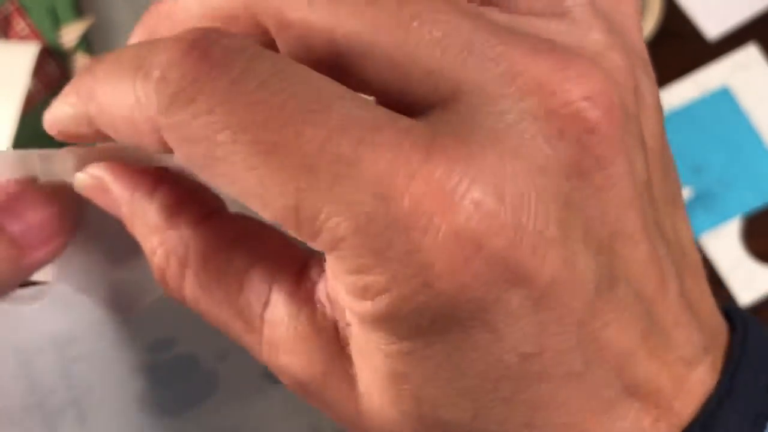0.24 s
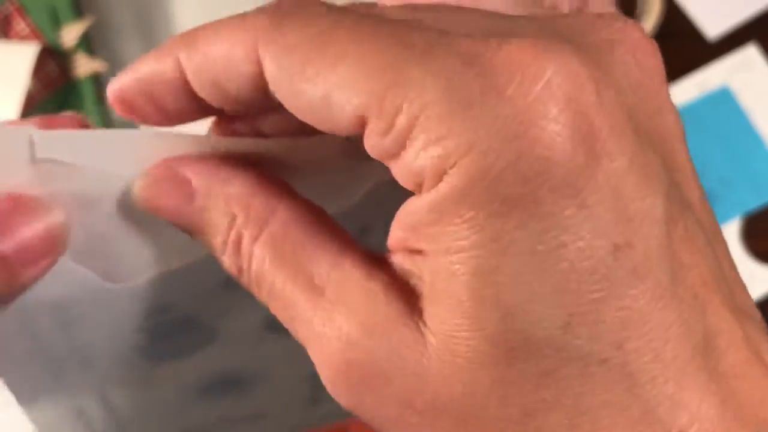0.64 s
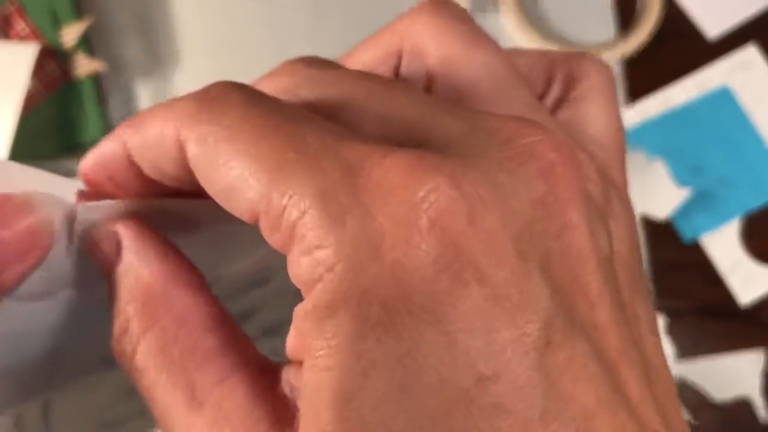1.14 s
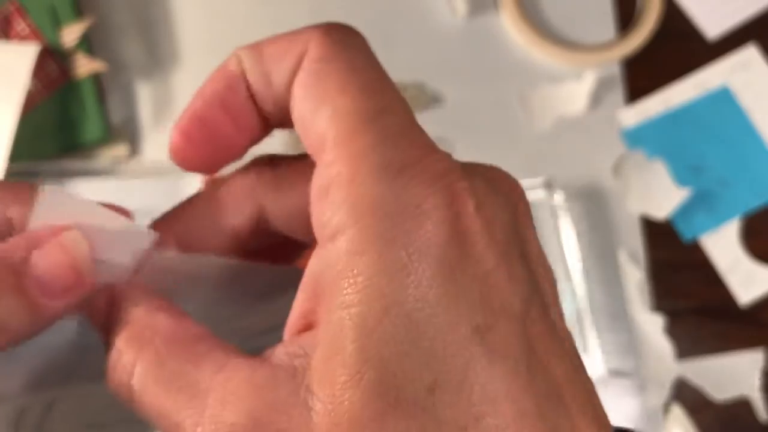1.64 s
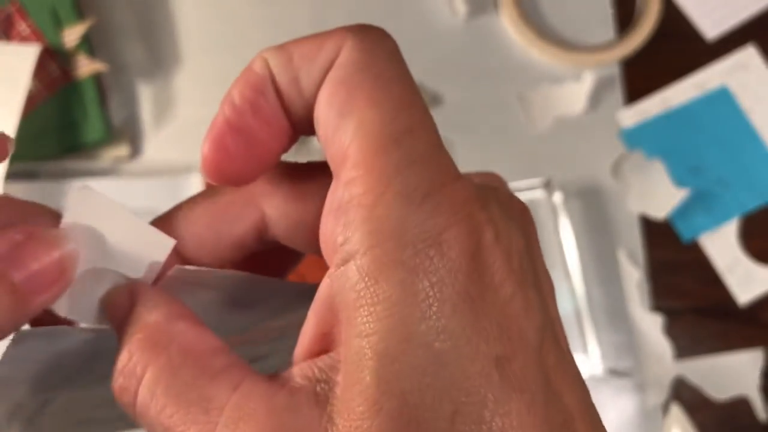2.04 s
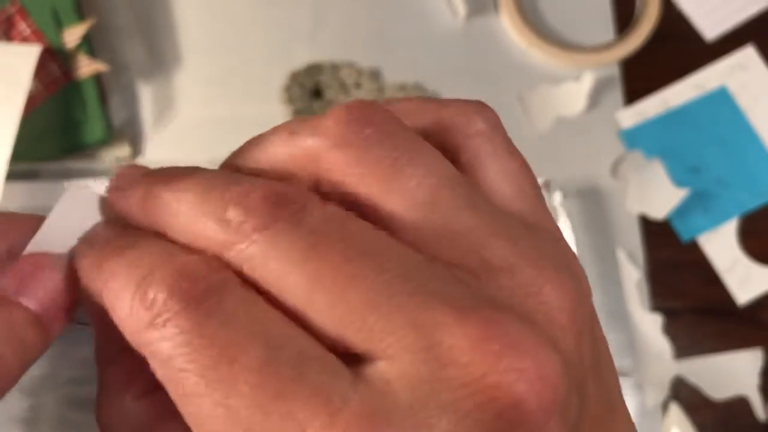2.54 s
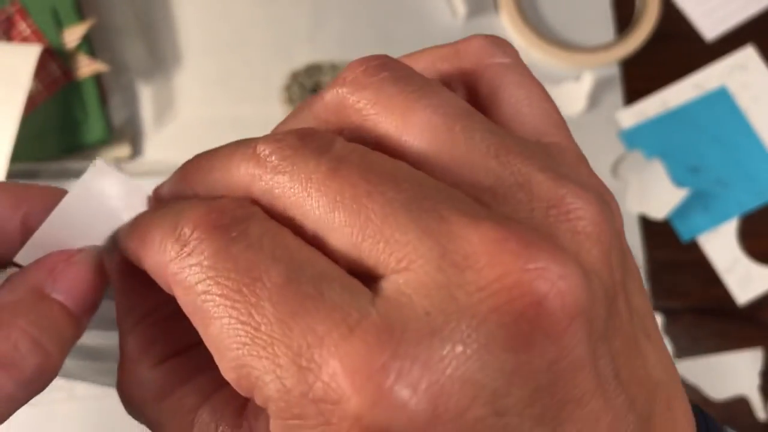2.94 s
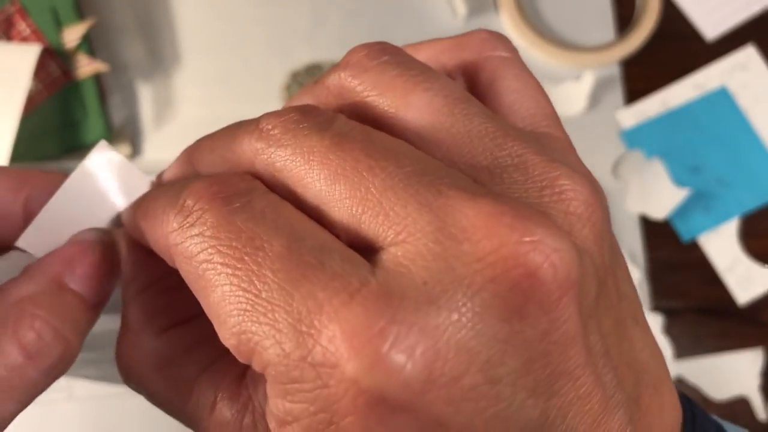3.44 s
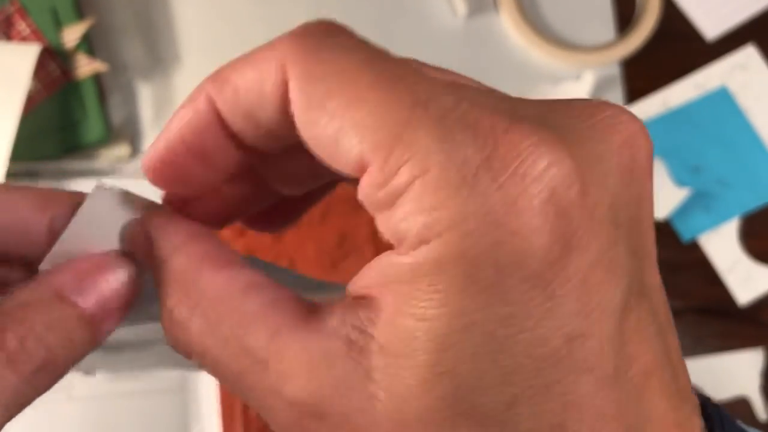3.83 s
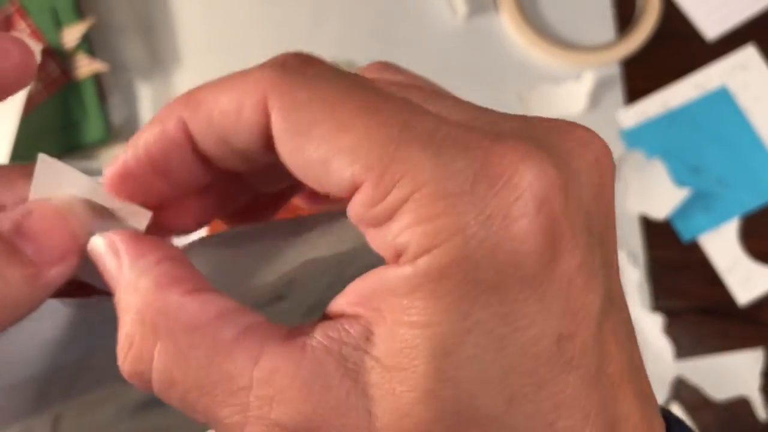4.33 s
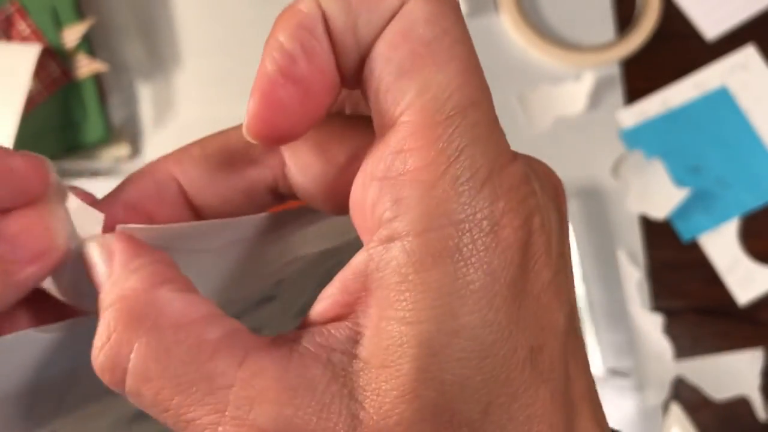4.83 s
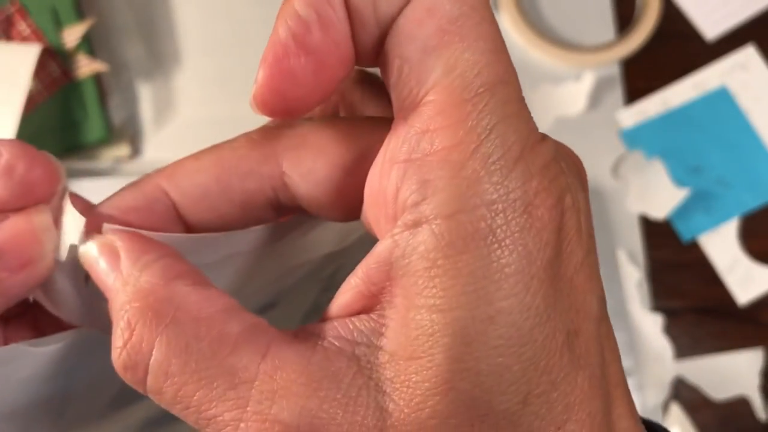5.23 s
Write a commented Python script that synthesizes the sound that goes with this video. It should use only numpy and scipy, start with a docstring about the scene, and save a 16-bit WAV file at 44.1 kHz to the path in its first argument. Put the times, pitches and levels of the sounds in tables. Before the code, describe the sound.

Fingernails pick at the corner of a small adhesive sheet, heard close up at a table in a quiet room. The stiff film gives light, irregular snaps and crinkles, mixed with brief nail scrapes and papery fingertip rubbing. The clicks are busiest and sharpest in the first two seconds, then thin out into tiny sticky ticks before a little more picking. Hands softly bump the table a few times over a faint hum.

```python
"""At a table in a quiet room, fingernails pick at the corner of a small sticky sheet, heard close up.
The stiff film snaps as a nail slips off its edge. Nails scrape, fingertips slide over the backing,
the film crinkles and threads of glue let go with tiny ticks. Hard flicks knock the table, and it booms
low when the hands softly bump it. Faint rumble and hum lie under it all."""
import sys
import numpy as np
from scipy import signal
from scipy.fft import rfft, irfft, next_fast_len
from scipy.io import wavfile
from scipy.ndimage import uniform_filter1d, map_coordinates

SR = 44100
rng = np.random.default_rng(int(sys.argv[2]) if len(sys.argv) > 2 else 0)


def int16_out(signal):
    """Quantize to a 16-bit WAV file."""
    q = np.round(np.clip(np.atleast_2d(signal).T, -1, 1) * 32767)
    wavfile.write(sys.argv[1], SR, q.astype(np.int16))


N = 241484  # about 5.5 seconds
TOP_HZ = 16100  # upper edge of the treble


def amp(db):
    """Turn decibels into a number to multiply by."""
    return 10 ** (np.asarray(db) / 20)


def unit(x):
    """Scale a sound so that its average (rms) level is 1."""
    return x / np.sqrt(np.mean(x ** 2) + 1e-20)


def along(points, hz):
    """Read between (Hz, value) points, with octaves evenly spaced."""
    point_hz, values = np.transpose(points)
    return np.interp(np.log(hz + 1), np.log(point_hz + 1), values)


def wobble(rate):
    """A smooth random curve that passes through `rate` new values a second."""
    values = rng.standard_normal(int(N * rate / SR) + 4)
    return map_coordinates(values, [np.arange(N) * rate / SR])


def filtered(x, response):
    """Change a sound's tone: `response` gives the gain at each frequency."""
    size = next_fast_len(len(x) + 8192)
    hz = np.fft.rfftfreq(size, 1 / SR) + 1
    return irfft(rfft(x, size) * response(hz), size)[:len(x)]


def causal(x, response, size=4096):
    """Change a short sound's tone so that nothing rings before its start."""
    hz = np.fft.rfftfreq(size, 1 / SR) + 1
    cepstrum = irfft(np.log(np.maximum(response(hz), 1e-6)))
    # move the filter's early ringing to after the start
    cepstrum[1:size // 2] *= 2
    cepstrum[size // 2 + 1:] = 0
    return irfft(rfft(x, size) * np.exp(rfft(cepstrum)))


def friction(count, rate, spread_db, share):
    """Surfaces catch and slip `rate` times a second; `share` is the catches' part of the energy."""
    catches = (rng.random(count) < rate / SR) * rng.choice([-1, 1], count)
    sizes = amp(spread_db * np.minimum(rng.exponential(size=count), 3))
    sliding = rng.standard_normal(count)
    return np.sqrt(share) * unit(catches * sizes) + np.sqrt(1 - share) * sliding


def film(hz, low_hz, high_hz, leak_db=-22):
    """A flap of film sounds mostly between two frequencies: the smaller the flap, the higher they lie."""
    bass_cut = amp(leak_db) + (1 + (low_hz / hz) ** 6) ** -.5
    return bass_cut / np.sqrt(1 + (hz / high_hz) ** 5)


def strike(flutter, tone, share):
    """One crack, holding `share` of the energy, and its flutter are given the same tone."""
    crack = unit(causal(np.ones(1), tone))
    return unit(np.sqrt(share) * crack + np.sqrt(1 - share) * unit(causal(flutter, tone)))


def thud(count, low_hz, high_hz):
    """Dull noise, mostly between two frequencies."""
    noise = rng.standard_normal(count)
    return unit(filtered(noise, lambda hz: 1 / (1 + (low_hz / hz) ** 3 + (hz / high_hz) ** 4)))


# The tone of the room's rumble and hiss. Each row: frequency in Hz, relative level in dB.
AIR_TONE = [(20, -15.5), (35, -9.5), (54, -0.5), (92, -7.5), (125, -11.5), (160, -14), (230, -20),
            (370, -19.5), (500, -29.5), (900, -32), (2400, -38), (6000, -46.5), (10000, -50), (15500, -42)]
# The steady notes of the hum. Each row: pitch in Hz, level in dB.
HUM_NOTES = [(59, -69), (119, -68.5), (188, -72), (381, -78.5)]
def background(air_db=-59.0, waver_db=2):
    """The room rumbles and hisses faintly, with a wavering hum."""
    t = np.arange(N) / SR
    air = unit(filtered(rng.standard_normal(N), lambda hz: amp(along(AIR_TONE, hz))))
    hum = np.zeros(N)
    for hz, db in HUM_NOTES:
        peak = amp(db + waver_db * wobble(4)) * np.sqrt(2)
        hum += peak * np.sin(2 * np.pi * hz * t + 0.72 * wobble(4))
    return amp(air_db) * air + hum


# The film snapping off a nail. Each row: start in seconds, level in dB, low and high edge in Hz,
# ring pitch in Hz, ring level in dB above the rest of the snap, seconds for the flutter to fade 60 dB.
SNAPS = [(0.0572, -44.5, 950, 4570, 3380, -9.5, 0.012), (.153, -55.5, 920, 8700, 3200, 0, 0.015),
         (.224, -54, 300, 6700, 2040, -4, 0.011), (0.5432, -57.5, 490, 4280, 517, -2, 0.02),
         (.568, -53.5, 510, 5200, 1720, 11, 0.026), (.612, -52, 1400, 10000, 2800, -14, 0.035),
         (0.692, -47, 300, 7300, 1300, -8, 0.059), (0.7066, -37.5, 590, 10300, 1490, -11, 0.029),
         (0.7096, -43.5, 200, 7000, 400, -1, 0.012), (0.715, -46.5, 300, 7700, 980, 4, .017),
         (0.7366, -53.5, 370, 8900, 910, -3, 0.021), (0.816, -37, 390, 4240, 980, 0, 0.014),
         (0.8353, -46.5, 640, 8360, 1000, -5, 0.043), (0.926, -43, 506, 2800, 2980, -5, .025),
         (0.9291, -46.5, 300, 3070, 1800, -3, 0.021), (0.9564, -34, 330, 6250, 1510, -8.5, 0.016),
         (1.0253, -51.5, 300, 10000, 494, -9, 0.038), (1.043, -47.5, 308, 3340, 560, 1, 0.03),
         (1.201, -43.5, 2170, 12900, 2900, -9, 0.028), (1.2227, -59.5, 447, 1100, 690, -2, .02),
         (1.274, -49.5, 1660, 3120, 2820, -3, 0.0098), (1.4626, -53, 3200, 17000, 3200, -20, 0.015),
         (1.4866, -27.5, 2940, 16700, 5560, -15, 0.0093), (1.4924, -34.5, 2840, 17000, 2950, -19, 0.023),
         (1.6929, -30, 3000, 17000, 12400, 3, .024), (1.7031, -35.5, 1190, 17000, 7200, 1, 0.018),
         (1.7114, -40, 1190, 17000, 13000, 2, 0.017), (1.7213, -33, 850, 9200, 3060, 0.5, 0.015),
         (1.7597, -49, 300, 9600, 870, -17, 0.058), (1.766, -47.5, 630, 13000, 3600, -2, 0.031),
         (1.786, -58, 300, 1000, 516, 2, .025), (1.8164, -45.5, 3450, 16000, 3870, -7, 0.057),
         (1.8219, -44, 2500, 14000, 14700, 2, 0.045), (1.9324, -54.5, 530, 3380, 1010, 1, 0.023),
         (1.9839, -50, 490, 5750, 920, 5, 0.017), (2.0605, -33.5, 700, 3940, 1950, 0, 0.018),
         (2.3602, -60.5, 296, 14200, 1580, -12, .03), (2.3905, -58, 790, 17000, 3900, -18, .04),
         (2.6061, -57, 300, 8450, 460, -8, 0.059), (2.7133, -57, 293, 960, 950, -24, 0.021),
         (2.79, -53.5, 2620, 17000, 8730, -3, 0.039), (2.9011, -58, 7350, 14000, 13900, -17, 0.029),
         (3.191, -43, 3500, 17400, 14600, -12, .018), (3.503, -66, 700, 4540, 1300, -6, .018),
         (3.688, -58, 300, 1800, 935, 1, 0.033), (3.8561, -44.5, 550, 17000, 9400, 5, .009),
         (4.027, -54, 500, 3670, 990, -6, 0.02), (4.1395, -58.5, 380, 16900, 1000, -6, 0.012),
         (4.4135, -48, 630, 7000, 6060, -9, 0.03), (4.4981, -58.5, 790, 4120, 3200, 4, .014),
         (4.5104, -57.5, 460, 14000, 4600, -8, .016), (4.5483, -44.5, 1580, 3230, 2900, -16, .018),
         (4.567, -48.5, 300, 5000, 910, -14, 0.014), (4.6603, -57.5, 410, 8300, 3700, -7, 0.053),
         (4.682, -50, 296, 7600, 1130, -5, 0.017), (4.893, -64, 900, 8000, 1500, -4, 0.026),
         (4.9877, -61, 980, 13100, 1020, -8, 0.018), (5.0353, -59.5, 490, 8050, 560, -4, 0.014),
         (5.4572, -55.5, 436, 16000, 950, -25, .026)]
def snaps(sharpness=6, ring_crack_share=0.66):
    """Each snap is one sharp crack and a brief flutter, which set the flap of film ringing."""
    out, t = np.zeros(N), np.arange(SR // 16) / SR
    for start, db, low_hz, high_hz, ring_hz, ring_db, fade_s in SNAPS:
        flutter = friction(len(t), rate=2500, spread_db=4.5, share=0.73) * amp(-60 * t / fade_s)
        # a quick release has more crack, a slow one is mostly flutter
        crack_share = .8 * np.exp(-fade_s / 0.016)
        band = lambda hz: film(hz, low_hz, high_hz)
        # the flap's free length sets the pitch of its ring
        ring = lambda hz: band(hz) / np.hypot(1, sharpness * (hz / ring_hz - ring_hz / hz))
        snap = strike(flutter, band, crack_share) + amp(ring_db) * strike(flutter, ring, ring_crack_share)
        # set the level as if all the energy fell in a hundredth of a second
        add(out, start, amp(db) * snap / np.linalg.norm(snap) * np.sqrt(SR / 100))
    return out


# Short nail scrapes. Each row: start in seconds, length in seconds, level in dB, strongest frequency in Hz.
SCRAPES = [(0.087, 0.035, -65, 2760), (0.21, 0.023, -58.5, 2950), (0.233, 0.11, -66.5, 428),
           (0.589, .028, -59.5, 5400), (0.678, 0.025, -55.5, 3480), (0.837, 0.046, -54, 4460),
           (0.895, 0.035, -65, 3500), (1.028, 0.032, -58.5, 3500), (1.058, 0.0072, -66, 870),
           (1.253, 0.035, -68.5, 2600), (1.403, 0.033, -59, 4200), (1.728, 0.046, -61, 6950),
           (1.817, 0.012, -54, 8900), (2.644, 0.054, -61.5, 9300), (2.9, 0.015, -64, 11200),
           (3.039, 0.026, -68.5, 3940), (4.15, 0.06, -69.5, 8000), (4.418, 0.024, -60.5, 4740),
           (4.526, 0.061, -62.5, 4000), (5.336, 0.034, -64, 2480)]
def scrapes():
    """A nail drags over the film in a brief gritty stroke."""
    out = np.zeros(N)
    for start, length, db, centre_hz in SCRAPES:
        count = int(length * SR)
        grit = friction(count, rate=550, spread_db=1.0, share=0.79) * signal.windows.tukey(count, .5)
        hump = lambda hz: 1 / (1 + np.log(hz / centre_hz) ** 2) ** 1.78
        add(out, start, amp(db) * unit(filtered(grit, hump)))
    return out


# A fingertip's strokes over the backing. Each row: start in seconds, length in seconds,
# relative level in dB, boost for the hiss in dB.
STROKES = [(0.215, 0.067, -65, -2), (0.349, 0.073, -65, -1.5), (.49, .15, -63, -6.5), (0.748, 0.11, -61, 1),
           (0.955, 0.032, -68.5, 5), (1.06, 0.052, -65.5, -1.5), (1.162, 0.15, -70.5, -8),
           (1.353, 0.077, -65.5, 3), (1.496, 0.12, -62.5, -1), (1.654, 0.1, -60.5, 5),
           (1.80, 0.074, -64, 2), (1.918, 0.076, -69.5, -2), (2.394, 0.14, -69, 4.5),
           (2.634, .045, -65.5, 4), (2.79, 0.047, -71.5, -1), (3.035, 0.019, -67, -9),
           (3.515, 0.028, -77, 2), (3.698, .26, -73.5, 3.5), (4.16, .06, -69, 0), (4.399, 0.06, -65.5, -1),
           (4.535, 0.081, -65.5, 1.5), (4.674, 0.073, -66, -0.5), (4.868, 0.089, -67.5, -5),
           (5.03, 0.1, -73, -11)]
def finger_strokes(press_s=0.039, lift_s=0.058):
    """How strong the rub and the hiss are over time, as a fingertip presses, holds and lifts."""
    t = np.arange(N) / SR
    rub, hiss = amp(-77), amp(-76)  # fingers merely holding the sheet
    for start, length, db, boost_db in STROKES:
        end = start + length
        stroke = amp(db) * np.interp(t, [start - press_s, start, end, end + lift_s], [0, 1, 1, 0])
        rub = np.hypot(rub, stroke)
        hiss = np.hypot(hiss, amp(boost_db) * stroke)
    return rub, hiss


# The tones of the skin's rub and of its hiss. Each row: frequency in Hz, relative level in dB.
RUB_TONE = [(150, -8.5), (400, -2.5), (1000, -7), (2000, -10), (3700, -9), (6000, -17.5), (9000, -38.5)]
HISS_TONE = [(2500, -34), (4500, -5.5), (7000, -1), (10000, -4.5), (13000, -3), (16000, -11.5)]
def slide(rub_gain, hiss_gain, rub_db=-0.97, hiss_db=-4.5, unsteady_db=2.13):
    """Skin slides over the backing with uneven pressure: a papery rub and a fine sticky hiss."""
    pressure = amp(unsteady_db * wobble(90))
    grain = friction(N, rate=260, spread_db=-1.5, share=0.29)
    rub = unit(filtered(grain, lambda hz: amp(along(RUB_TONE, hz))))
    fizz = friction(N, rate=570, spread_db=1.0, share=0.089)
    hiss = unit(filtered(fizz, lambda hz: amp(along(HISS_TONE, hz))))
    return pressure * (amp(rub_db) * rub_gain * rub + amp(hiss_db) * hiss_gain * hiss)


def film_tick(count, fade_s, low_hz, high_hz):
    """One tiny click from the film: a burst of noise that dies fast, scaled to a peak of 1."""
    t = np.arange(count) / SR
    burst = rng.standard_normal(count) * amp(-60 * t / fade_s)
    tick = causal(burst, lambda hz: film(hz, low_hz, high_hz))
    return tick / np.abs(tick).max()


def crinkles(hiss_gain, per_second=45, boost_db=12, spread_db=1.0):
    """The sticky film crackles at random, louder while a fingertip moves over it."""
    sizes = amp(spread_db * np.minimum(rng.exponential(size=N), 3))
    cracks = (rng.random(N) < per_second / SR) * sizes * hiss_gain
    tick = film_tick(SR // 100, fade_s=0.0068, low_hz=2200, high_hz=11000)
    return amp(boost_db) * signal.fftconvolve(cracks, tick)[:N]


# Flicks of a nail that jolt the table. Each row: start in seconds, level in dB.
KNOCKS = [(0.707, -43), (0.927, -52.5), (0.956, -47)]
def knocks(fade_s=0.074):
    """A hard flick gives a short dull knock under the snap."""
    out, t = np.zeros(N), np.arange(SR // 12) / SR
    for start, db in KNOCKS:
        add(out, start, amp(db - 60 * t / fade_s) * thud(len(t), low_hz=95, high_hz=380))
    return out


# The low notes the table rings at. Each row: pitch in Hz, relative level in dB,
# level of the lingering part in dB compared with the swell, seconds to fade 60 dB.
TABLE_NOTES = [(54.9, 1, -12.5, 0.6), (74.9, -13, -2.5, 0.38), (124.8, -26, -13.5, 0.33),
               (171, -35.5, -11, 0.45), (282, -30, -31.5, .15)]
# Hands bumping the table. Each row: start in seconds, relative level in dB,
# length of the push in seconds, level of the skin's brush in dB compared with the push.
BUMPS = [(1.343, -30, .07, -22), (1.93, -34, 0.08, -24), (2.437, -27.5, 0.081, -19.5),
         (2.937, -37, .088, -21), (3.607, -36, .12, -17)]
def bumps(boost_db=1.5):
    """A soft push makes the table's low notes swell, then linger weakly; skin adds a dull brush."""
    out, t = np.zeros(N), np.arange(SR // 2) / SR
    for start, db, push_s, brush_db in BUMPS:
        progress = np.minimum(t / push_s, 1)
        swell = np.sin(np.pi * progress) ** 2
        boom = np.zeros(len(t))
        for hz, note_db, linger_db, fade_s in TABLE_NOTES:
            linger = progress ** 2 * amp(linger_db - 60 * np.maximum(t - push_s, 0) / fade_s)
            boom += amp(note_db) * (swell + linger) * np.sin(2 * np.pi * hz * t)
        brush = amp(brush_db) * swell * thud(len(t), low_hz=80, high_hz=215)
        add(out, start, amp(db + boost_db) * (boom + brush))
    return out


# Threads of glue breaking. Each row: start in seconds, peak level in dB.
GLUE_TICKS = [(2.7137, -49), (2.823, -52), (2.8394, -57), (2.875, -49), (3.1129, -47), (3.569, -51),
              (3.6997, -46.5), (4.79, -56), (5.1043, -63), (5.405, -57)]
def glue_ticks():
    """Threads of glue let go in tiny bright ticks."""
    out = np.zeros(N)
    for start, db in GLUE_TICKS:
        add(out, start, amp(db) * film_tick(SR // 50, fade_s=0.0073, low_hz=6500, high_hz=TOP_HZ))
    return out


def add(track, start, sound):
    """Mix a sound into the track, `start` seconds in."""
    first = max(round(start * SR), 0)
    part = track[first:first + len(sound)]
    part += sound[:len(part)]


def shifting_contact(x, depth_db=2.1, size=512):
    """As the touch shifts, random patches of the tone grow louder and softer."""
    spectrum = signal.stft(x, nperseg=size)[2]
    patches = uniform_filter1d(rng.standard_normal(spectrum.shape), size=8, axis=0)  # smooth in pitch
    patches = uniform_filter1d(patches, size=8, axis=1)  # and in time
    return signal.istft(spectrum * amp(depth_db * unit(patches)), nperseg=size)[1][:len(x)]


def table_echo(x, gain=0.24, delay_s=0.001434, dull_hz=2600):
    """Sound from the film's back, opposite in sign, bounces off the table and hollows the middle tones."""
    echo = lambda hz: gain * np.exp(-2j * np.pi * hz * delay_s) / (1 + (hz / dull_hz) ** 4)
    return filtered(x, lambda hz: 1 - echo(hz))


# How long the room rings. Each row: frequency in Hz, seconds to fade 60 dB.
ROOM_FADE = [(300, 0.25), (2000, 0.24), (7000, 0.11), (15000, 0.11)]
def room_echo(x, dull_hz=6000):
    """The room answers with a short, dull tail whose treble dies first."""
    hz, t, noise = signal.stft(rng.standard_normal(SR // 2), SR, nperseg=256)
    fade = amp(-60 * t / along(ROOM_FADE, hz)[:, None])
    tail = signal.istft(noise * fade, SR, nperseg=256)[1]
    tail = np.pad(tail / np.linalg.norm(tail), (SR // 200, 0))  # arrives 5 ms late
    return filtered(signal.fftconvolve(x, tail)[:N], lambda hz: 1 / np.hypot(1, hz / dull_hz))


def scene(room_db=-19):
    """Mix the nearby sheet, its faint room echo, the table and the background into one channel."""
    rub_gain, hiss_gain = finger_strokes()
    rubbing = shifting_contact(scrapes() + slide(rub_gain, hiss_gain) + crinkles(hiss_gain))
    sheet = table_echo(snaps() + glue_ticks() + rubbing)
    return (sheet + amp(room_db) * room_echo(sheet) + bumps() + knocks() + background())[None]


def record(dry):
    """Cut away the treble above TOP_HZ."""
    treble_cut = lambda hz: 1 / np.sqrt(1 + (hz / TOP_HZ) ** 120)
    return np.array([filtered(channel, treble_cut) for channel in dry])


dry = scene()
out = record(dry)
int16_out(out)
```